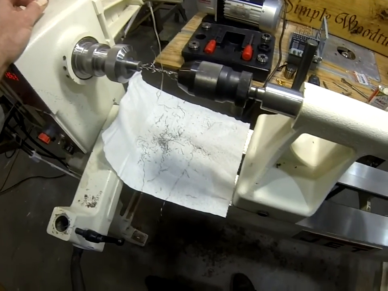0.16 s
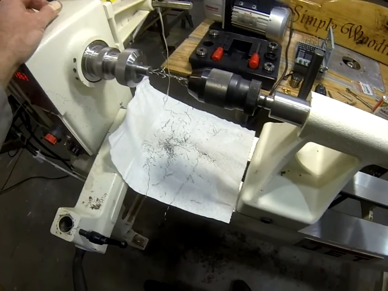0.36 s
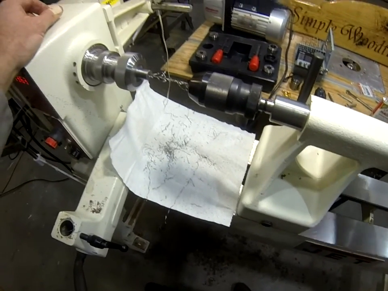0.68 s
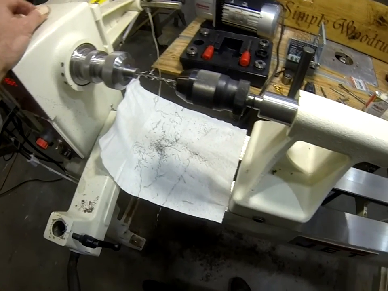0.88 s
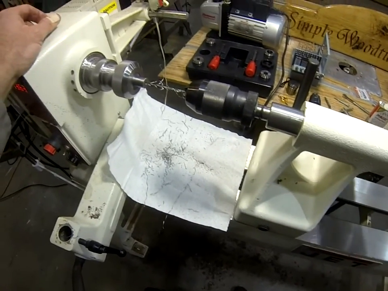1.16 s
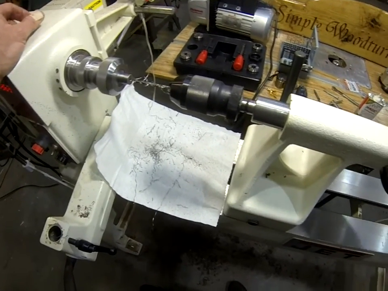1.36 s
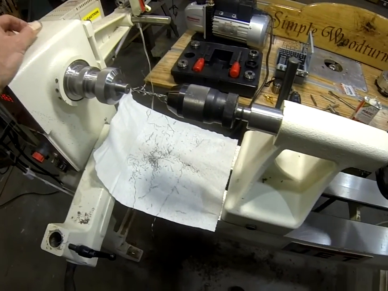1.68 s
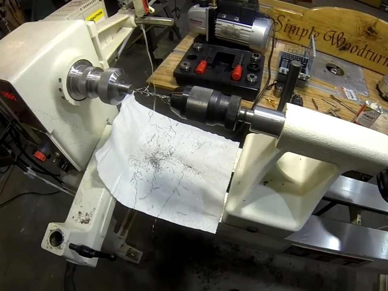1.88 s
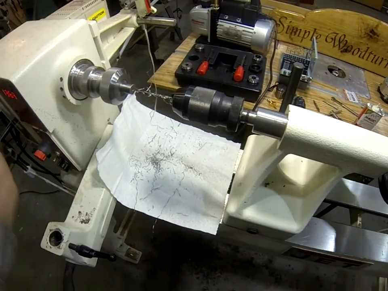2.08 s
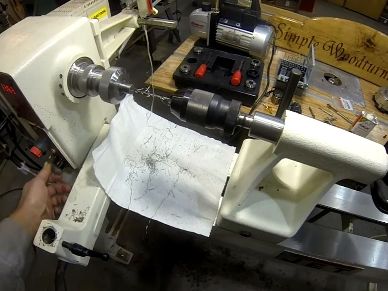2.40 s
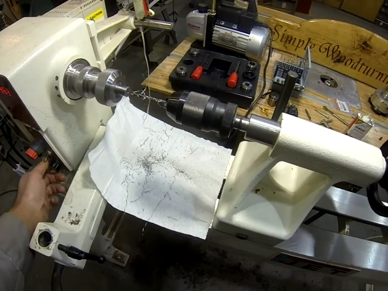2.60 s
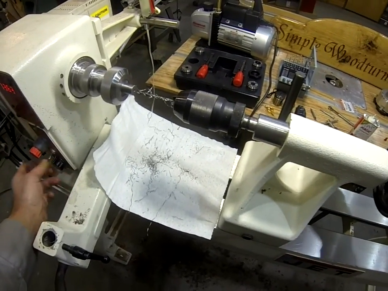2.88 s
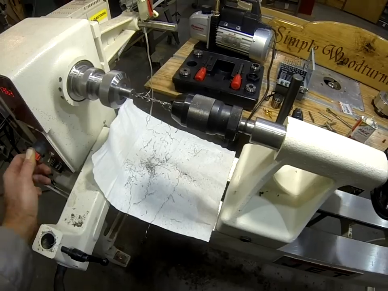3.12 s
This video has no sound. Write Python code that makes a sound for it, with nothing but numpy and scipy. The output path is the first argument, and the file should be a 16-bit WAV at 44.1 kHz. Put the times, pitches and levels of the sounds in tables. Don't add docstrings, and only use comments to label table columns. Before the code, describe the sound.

A lathe motor hums steadily throughout, with belt and fan rush, a thin high inverter whine and a fast buzzing chirp. At 0 s a sharp crack leaves steel ringing, soon damped, with a short scrape and knocks until 0.7 s. Sharper knocks come at 1.3-1.5 s, softer ones around 2-2.2 s, then faint dull scraping until 3 s. Tones shift as the head-worn camera turns in the small workshop.

```python
import sys
import numpy as np
from scipy import signal
from scipy.fft import rfft, irfft, next_fast_len
from scipy.io import wavfile
from scipy.ndimage import uniform_filter1d, map_coordinates

SR = 44100
rng = np.random.default_rng(int(sys.argv[2]) if len(sys.argv) > 2 else 0)


def magnitude_from_level(level_db):
    exponent = np.asarray(level_db, float) / 20
    return 10 ** exponent


def generate_wav(signal):
    frames = np.transpose(np.atleast_2d(signal))
    scaled = np.clip(frames, -1, 1) * 32767
    pcm = np.round(scaled).astype(np.int16)
    wavfile.write(sys.argv[1], SR, pcm)


N = 143325

# t/s, turn (0 facing to 1 turned), whine level/dB
HEAD_TURN = [(0, 0.3, -7), (.15, .02, -1), (.39, 0.01, 0.5), (.89, 0.1, -1), (1.04, 0, 0), (1.34, 0.27, -1),
             (1.5, 0, -1.5), (1.7, 0, -0.5), (1.89, 0, 3.5), (2.06, .4, 1.5), (2.15, 0.3, 1.5),
             (2.2, 0.68, -1), (2.45, 0.5, 1.5), (2.76, 0.7, 4.5), (2.9, 1, 0), (3.25, 1, -1)]
SHAFT_ORDERS = [9, 11, 13, 20, 21, 23, 25, 33, 34, 35, 36, 37, 38, 42.28, 42.94, 44.21, 45.19, 47, 48,
                60.25, 81.02]
# level facing/dB, level turned/dB
SHAFT_LEVELS = [(-55, -57), (-61, -56), (-61, -55), (-61, -62), (-66, -67), (-58, -62), (-55, -55),
                (-72, -65), (-49, -54), (-58, -56), (-51, -51), (-55, -56), (-50, -54), (-54, -54),
                (-67, -59), (-66, -62), (-62, -64), (-67, -65), (-55, -57), (-67, -66), (-61, -63)]
FIELD_ORDERS = [6, 12]
# level facing/dB, level turned/dB
FIELD_LEVELS = [(-52.5, -50), (-56, -46.5)]
SIDE_ORDERS = np.arange(-29, 30, 2)
# level facing/dB, level turned/dB
SIDE_LEVELS = [(-71, -66), (-75, -76), (-79, -81), (-65, -75), (-72, -70), (-74, -74), (-71, -76),
               (-76, -73), (-75, -69), (-77, -68), (-80, -76), (-79, -78), (-64, -70), (-56, -63),
               (-53, -62), (-59, -52), (-57, -57), (-70, -69), (-75, -65), (-69, -70), (-69, -63),
               (-82, -72), (-74, -78), (-76, -74), (-75, -71), (-76, -70), (-66, -75), (-74, -72),
               (-79, -76), (-71, -74)]
SLIP_ORDERS = [-6.5, -5.5, -3.5, -2.5, -1.5, -.5, .5, 2.5, 3.5, 5.5, 6.5, 7.5, 35]
# level facing/dB, level turned/dB
SLIP_LEVELS = [(-79, -74), (-64, -78), (-76, -70), (-84, -70), (-78, -72), (-73, -63), (-70, -75),
               (-81, -68), (-64, -64), (-71, -66), (-74, -70), (-67, -73), (-70, -77)]
# f/Hz, width/Hz, level/dB, time to fall 60 dB/s
TOOL_MODES = [(1570, 11, -46, 0.79), (2270, 180, -43, 0.8), (2392, 21, -36.5, 0.42), (2850, 20, -41, 0.21),
              (4440, 160, -40.5, 0.53), (7660, 69, -47, 0.16), (9470, 65, -54, 0.18),
              (11500, 500, -31, 0.064), (12470, 150, -47, 0.081), (13100, 470, -36, 0.18),
              (14100, 150, -43, .12)]
# f/Hz, level/dB
CLANG_COLOUR = [(300, -12), (1000, 1), (2400, -2.5), (5000, -10.5), (7000, -15), (9000, -5), (13000, -11.5),
                (15500, -13)]
# t/s, peak level/dB, centre f/Hz, time to fall 60 dB/s
KNOCKS = [(.09, -32, 606, 0.89), (.1, -36.5, 1700, 0.39), (1.279, -42, 4160, 0.034),
          (0.231, -33.5, 1230, 0.08), (.24, -33.5, 500, 0.17), (.254, -29.5, 925, 0.062),
          (0.5693, -38, 1290, 0.11), (0.626, -35, 1140, 0.13), (.627, -44, 2300, 0.17),
          (.64, -30, 593, 0.43), (.648, -45, 2200, 0.043), (1.353, -44, 3700, 0.13),
          (1.354, -34, 1500, 0.036), (1.357, -27, 980, 0.036), (1.504, -39, 2240, 0.06),
          (1.502, -29, 1000, 0.037), (1.512, -39.5, 2270, 0.12), (1.965, -44, 1990, 0.17),
          (2.108, -47, 2480, 0.071), (2.109, -34.5, 1120, .08), (2.112, -33, 780, 0.1),
          (2.157, -41, 2080, 0.07), (2.161, -45, 1200, .06), (2.2262, -37, 1270, 0.065)]
# f/Hz, share of the knock's fall time (no unit)
BED_MODES = [(470, 0.53), (740, 1.2), (1050, 1.9), (1350, 0.53), (1700, 0.47), (1900, 0.22), (2060, 0.93),
             (2350, 1.2), (3130, 0.19), (3750, 0.34), (4250, 1.5), (4900, 0.7), (5120, 1.7), (6500, 0.47)]
# t/s, peak
# level/dB, f/Hz, time to fall 60 dB/s
PINGS = [(.012, -36, 8650, .06), (.107, -39, 4050, .012), (.122, -41, 3750, .03), (.627, -31, 1165, .05),
         (.633, -31, 1165, .04), (.627, -44, 2950, .06), (.657, -44, 1690, .15), (.684, -46, 1690, .15),
         (1.3494, -33, 4850, .022), (1.351, -38, 3600, .04), (1.351, -35, 2050, .03),
         (1.4995, -33, 5150, .022), (1.4992, -41, 6480, .02), (1.4988, -33, 3250, .014),
         (1.4988, -34, 4300, .013), (1.499, -33, 2550, .016), (1.4995, -30, 1950, .025),
         (1.5, -31, 1400, .04), (2.1035, -33, 2070, .05), (2.1125, -32, 2120, .025),
         (2.104, -43, 5150, .025), (2.104, -43, 3550, .03), (2.104, -46, 4300, .02),
         (2.124, -43, 2350, .12)]
# t/s, peak level/dB, centre f/Hz, time to fall 60 dB/s
CRACKS = [
    (.0127, -17, 6000, .001),
    (.112, -40, 11500, .012),
    (.121, -39, 11500, .014),
    (.231, -42, 2200, .04),
    (.626, -40, 2000, .05),
    (1.3495, -35, 3000, .018),
    (1.4988, -30, 3200, .012),
    (2.103, -40, 3300, .018),
]
# t/s, length/s, level/dB
SCRAPES = [
    (.05, .095, -46),
    (.36, .1, -58),
    (1.6, .3, -63),
    (2.3, .28, -57),
    (2.7, .28, -57),
]
# f/Hz, level/dB
SWARF_COLOUR = [(1500, -20), (4000, -10), (7000, -24), (8800, -3), (11700, 0), (14000, -4), (15500, -10)]
# f/Hz, level per Hz/dB
BODY_NOISE = [(20, -69.5), (90, -78), (200, -82), (290, -76.5), (520, -76), (1050, -80.5), (1300, -83.5),
              (1600, -96.5)]
# f/Hz, level per Hz/dB
FAN_HISS = [(1200, -82.5), (2750, -91), (4900, -87.5), (5600, -95), (7000, -99), (8700, -89), (12000, -92),
            (15500, -97)]
# f/Hz, width/Hz, level/dB
CASING = [(649, 145, -57.5), (902, 190, -58.5), (2408, 120, -65.5), (3243, 180, -61.5), (3716, 117, -60),
          (5070, 82, -70)]

SHAFT_HZ, FIELD_HZ, CARRIER_HZ, MAINS_HZ = 27.515, 55.07, 10000, 119.9


def unit(x):
    return x / np.sqrt(np.mean(x ** 2) + 1e-20)


def along(points, hz):
    f, db = np.transpose(points)
    return np.interp(np.log(hz + 1), np.log(f + 1), db, left=-120, right=-120)


def wobble(rate):
    steps = np.arange(0, N + 64, 64)
    curve = map_coordinates(rng.standard_normal(400), [steps * min(rate, 100) / SR])
    return np.interp(np.arange(N), steps, curve)


def filtered(x, response):
    m = next_fast_len(len(x) + 8192)
    return irfft(rfft(x, m) * response(np.fft.rfftfreq(m, 1 / SR)), m)[:len(x)]


def peak(f, hz, width_hz):
    return 1j * f * width_hz / (hz * hz - f * f + 1j * f * width_hz)


def resonant_noise(length, hz, width_hz, power):
    return unit(filtered(rng.standard_normal(length), lambda f: peak(f, hz, width_hz) ** power))


def coloured(noise, points):
    return filtered(noise, lambda f: magnitude_from_level(along(points, f)))


def patchy(depth_db):
    z = signal.stft(rng.standard_normal(N + 512), nperseg=512)[2]
    patches = uniform_filter1d(rng.standard_normal(z.shape), size=6, axis=0)
    patches = uniform_filter1d(patches, size=12, axis=1)
    return unit(signal.istft(z * magnitude_from_level(depth_db * unit(patches)), nperseg=512)[1][:N])


def head():
    t = np.arange(N) / SR
    s, turn, whine_db = np.transpose(HEAD_TURN)
    return np.interp(t, s, turn), np.interp(t, s, whine_db)


def tones(hzs, levels, drift_db, blur, stagger=.2):
    t, turn = np.arange(N) / SR, head()[0]
    starts = np.pi * np.arange(len(hzs)) ** 2 * stagger
    out = np.zeros(N)
    for hz, start, (facing_db, turned_db) in zip(hzs, starts, levels):
        gain = magnitude_from_level(facing_db + (turned_db - facing_db) * turn + drift_db * wobble(5))
        out += np.sqrt(2) * gain * np.sin(2 * np.pi * hz * t + start + blur * wobble(1.5))
    return out


def motor():
    shaft = tones(SHAFT_HZ * np.array(SHAFT_ORDERS), SHAFT_LEVELS, drift_db=1.1, blur=.3, stagger=.07)
    field = tones(FIELD_HZ * np.array(FIELD_ORDERS), FIELD_LEVELS, drift_db=.7, blur=.2)
    mains = tones([MAINS_HZ], [(-60, -60)], drift_db=-1.5, blur=.9)
    return shaft + field + mains


def whine():
    hzs = CARRIER_HZ + FIELD_HZ * np.r_[SIDE_ORDERS, SLIP_ORDERS]
    levels = list(SIDE_LEVELS) + list(SLIP_LEVELS)
    return magnitude_from_level(head()[1]) * tones(hzs, levels, drift_db=1.5, blur=.3, stagger=.15)


def supply():
    t = np.arange(N) / SR
    bursts_hz, burst_start, burst_share = 47.955, .37, .38
    is_on = (bursts_hz * t - burst_start) % 1 < burst_share
    gate = uniform_filter1d(1. * is_on, size=50)
    phase = 2 * np.pi * 6448 * t + .6 * (.5 * wobble(60) + 2 * wobble(11))
    chirp = magnitude_from_level(-63) * np.sin(phase) + magnitude_from_level(-54) * np.sin(2 * phase)
    return np.sqrt(2) * gate * magnitude_from_level(wobble(50)) * chirp


def tool():
    t = np.arange(SR) / SR
    ring = np.zeros(SR)
    for hz, width_hz, db, t60 in TOOL_MODES:
        ring += magnitude_from_level(db - 60 * t / t60) * resonant_noise(SR, hz, width_hz, 1)
    clang = magnitude_from_level(-34 - 60 * t / .53) * unit(coloured(rng.standard_normal(SR), CLANG_COLOUR))
    sing_gain = np.sqrt(2) * magnitude_from_level(-40 - 60 * t / .5 + 5.5 * wobble(100)[:SR])
    sing = sing_gain * np.sin(2 * np.pi * 4495 * t + 1.2 * wobble(100)[:SR])
    touch_s = .12
    damping = magnitude_from_level(-60 * np.maximum(t - touch_s, 0) / .3)
    return np.pad((ring + sing) * damping + clang, (0, N - SR))


def knocks():
    out, t = np.zeros(N + SR), np.arange(SR // 4) / SR
    for s, db, hz, t60 in KNOCKS:
        puff = resonant_noise(len(t), hz, 1.1 * hz, 2)
        ring = np.zeros(len(t))
        for mode_hz, share in BED_MODES:
            nearness = abs(peak(mode_hz, hz, .35 * hz)) ** 2
            decay = magnitude_from_level(rng.normal(0, 2) - 60 * t / (t60 * share))
            ring += nearness * decay * np.sin(2 * np.pi * (mode_hz * t + rng.random()))
        puff_and_tail = puff * (magnitude_from_level(-11.5 - 60 * t / t60) + magnitude_from_level(-17.5 - 60 * t / .57))
        onset = 1 - np.exp(-t * hz / .66)
        out[round(s * SR):][:len(t)] += magnitude_from_level(db) * (.5 * ring + puff_and_tail) * onset
    return out[:N]


def ticks():
    out, t = np.zeros(N + SR), np.arange(SR // 4) / SR
    for s, db, hz, t60 in PINGS:
        onset = 1 - np.exp(-t * hz / .7)
        out[round(s * SR):][:len(t)] += magnitude_from_level(db - 60 * t / t60) * np.sin(2 * np.pi * hz * t) * onset
    for s, db, hz, t60 in CRACKS:
        burst = resonant_noise(len(t), hz, 1.3 * hz, 2)
        out[round(s * SR):][:len(t)] += magnitude_from_level(db - 60 * t / t60) * burst
    return out[:N]


def swarf():
    t = np.arange(N) / SR
    sizes = magnitude_from_level(1.5 * rng.exponential(size=N))
    grains = unit(coloured(rng.standard_normal(N) * sizes, SWARF_COLOUR))
    stroke = np.zeros(N)
    for s, length, db in SCRAPES:
        stroke += magnitude_from_level(db) * np.clip(np.minimum((t - s) / .025, (s + length - t) / .05), 0, 1)
    rub_start, rub_end = 2.2, 2.98
    rub_fade = np.clip(np.minimum(t - rub_start, rub_end - t) / .1, 0, 1)
    rub = resonant_noise(N, 5230, 2000, 2) * rub_fade
    return grains * stroke * magnitude_from_level(.85 * wobble(79)) + magnitude_from_level(-58) * rub


def rumble():
    throb = np.cos(2 * np.pi * SHAFT_HZ * np.arange(N) / SR + .43 * wobble(2.6))
    body = magnitude_from_level(1.3 * throb + .56 * wobble(13.27)) * coloured(patchy(depth_db=1.5), BODY_NOISE)
    hiss = magnitude_from_level(.51 * wobble(5.38) + .6 * wobble(40.7)) * coloured(patchy(depth_db=.42), FAN_HISS)
    out = np.sqrt(SR / 2) * (body + hiss)
    for hz, width_hz, db in CASING:
        out += magnitude_from_level(db + .58 * throb + 1.5 * wobble(34.2)) * resonant_noise(N, hz, width_hz, 2)
    return out


def scene():
    machine = motor() + whine() + supply() + rumble()
    handling = tool() + knocks() + ticks() + swarf()
    return (machine + handling)[None]


def roll_off(x):
    return signal.sosfilt(signal.butter(12, 15630, fs=SR, output="sos"), x)


def record(dry):
    heard = filtered(dry[0], lambda f: f < 15300)
    offset = .2274 + .0006 * wobble(8.6)
    line = magnitude_from_level(-85) * np.sin(2 * np.pi * 15600 * np.arange(N) / SR)
    return roll_off((heard + offset + line)[None])


dry = scene()
out = record(dry)
generate_wav(out)
```